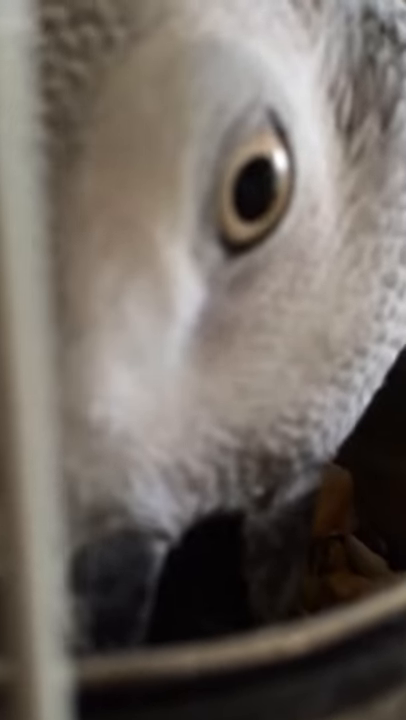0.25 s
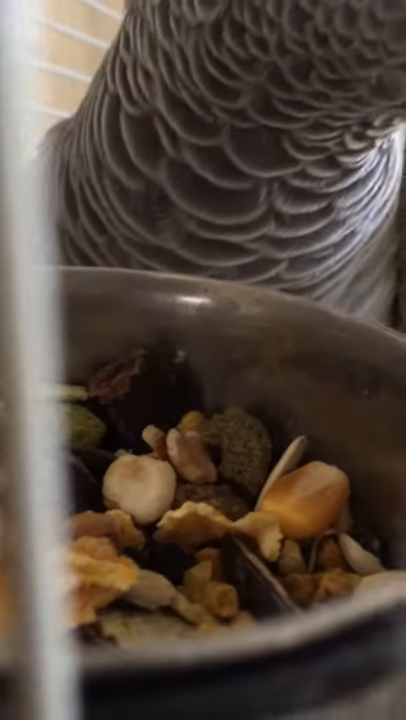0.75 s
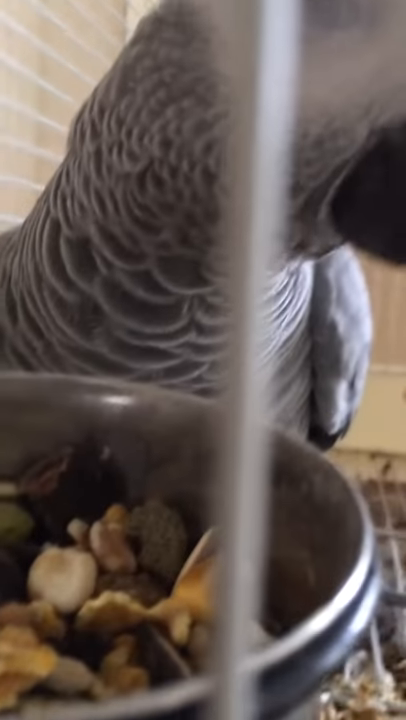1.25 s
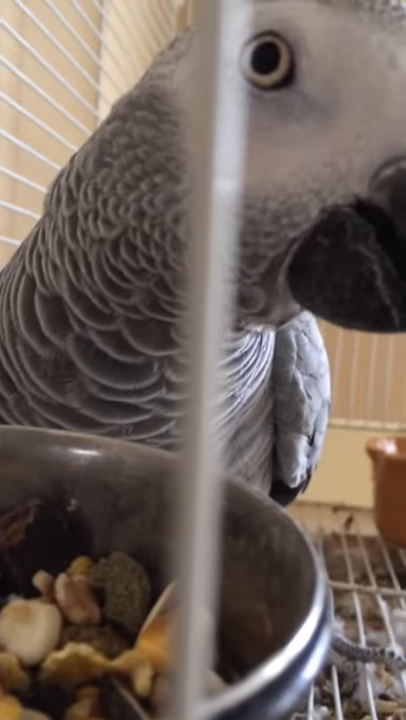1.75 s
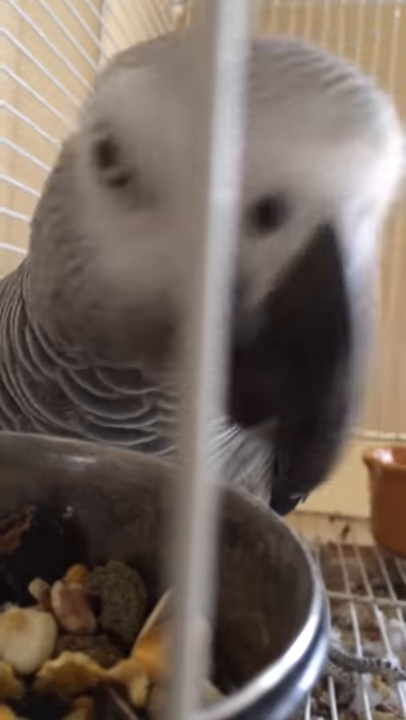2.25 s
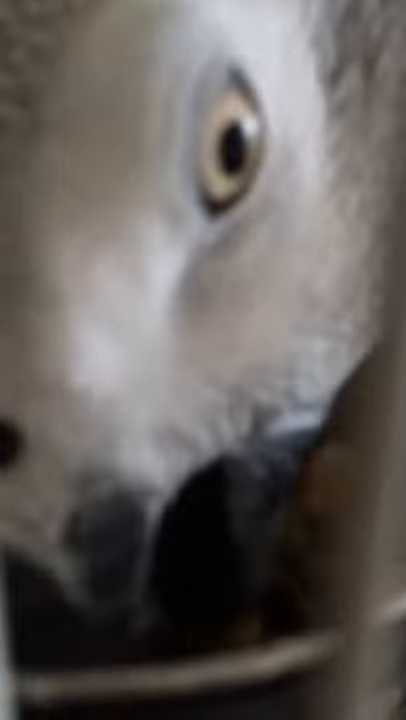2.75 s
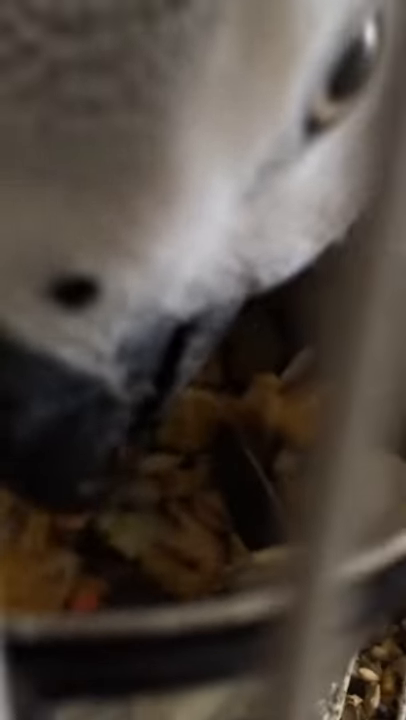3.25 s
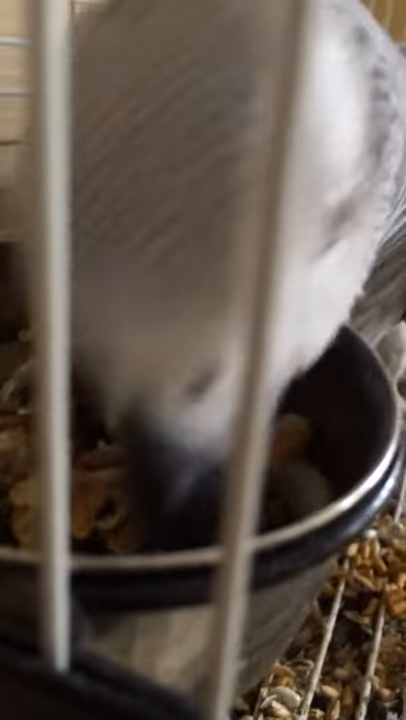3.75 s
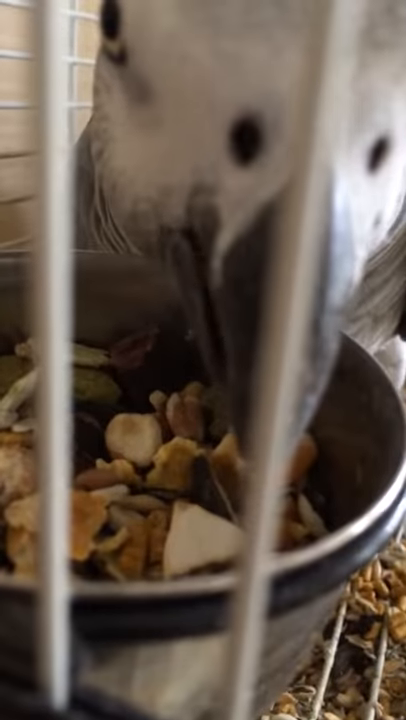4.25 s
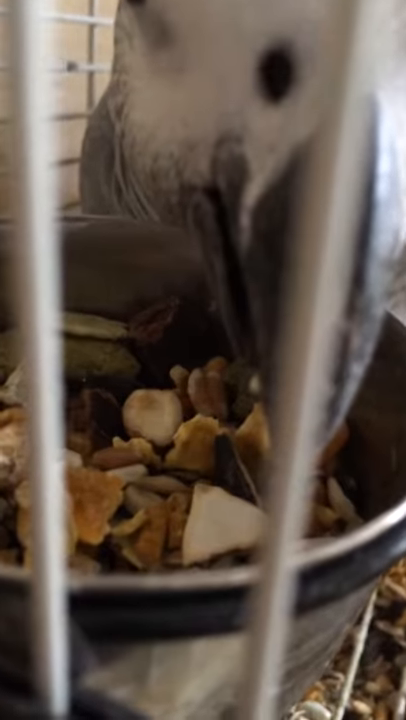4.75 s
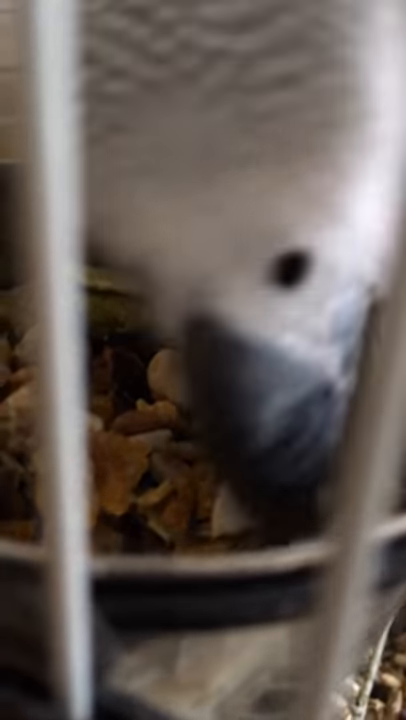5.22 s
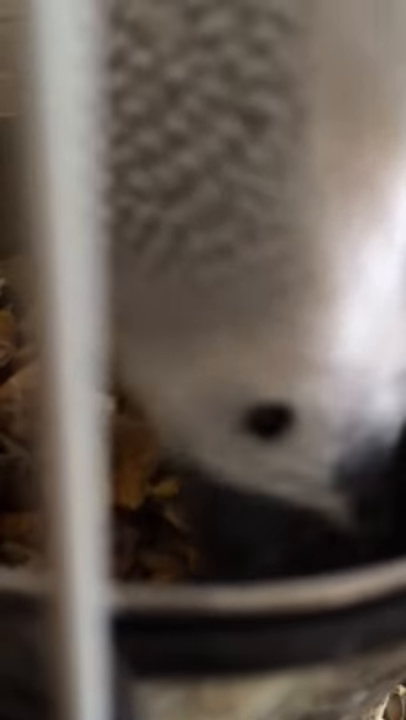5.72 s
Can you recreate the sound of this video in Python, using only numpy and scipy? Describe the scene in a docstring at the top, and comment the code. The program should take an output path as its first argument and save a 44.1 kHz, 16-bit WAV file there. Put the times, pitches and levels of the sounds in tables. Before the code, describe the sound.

A parrot eats from a metal food bowl in a small room, very close to the microphone. It opens with a click and a short gritty rattle of dry food, with a cluster of small crunches around 0.5 seconds. Loud, bright cracks of seed hulls come at about 1.1, 1.3 and 2 seconds, each briefly ringing beak and bowl, with a faint answer from the walls. From 2.8 to 3.2 seconds the beak rummages and crunches busily. Lighter clicks, taps and a soft chewing rustle continue until two sharp cracks, the loudest, land close together around 4.8 and 4.9 seconds. More stirring and snapping follows from 5.4 seconds to the end at 6. Throughout, household machines hum and rumble quietly, and a low drone swells from about 3 seconds. A few very faint, brief, thin tones sound far off between 1 and 5 seconds.

```python
"""Bright clicks and a gritty rattle, close up: a parrot cracks seed and rummages in a metal food bowl.
The microphone is a phone beside the bird in a small room. Each breaking hull rings beak and bowl, and
the walls answer faintly. Between snaps the beak stirs dry food, taps, and chews with a soft rustle.
Household machines hum and rumble underneath, swelling late; faint thin tones sound far off."""
import sys
import numpy as np
from scipy import signal
from scipy.fft import rfft, irfft, next_fast_len
from scipy.io import wavfile
from scipy.ndimage import uniform_filter1d, map_coordinates

SR = 44100
rng = np.random.default_rng(int(sys.argv[2]) if len(sys.argv) > 2 else 0)


def digitize_waveform(pressure):
    """Quantize a signal to 16-bit integers and store it at the path in sys.argv[1].

    Rows of a 2-D input are taken as channels; values are limited to [-1, 1].
    """
    field = np.atleast_2d(pressure).T
    bounded = np.clip(field, -1, 1)
    quanta = np.round(bounded * 32767).astype(np.int16)
    wavfile.write(sys.argv[1], SR, quanta)


N = 263718

# spectrum of the room tone: f/Hz, relative level/dB
ROOM_SPECTRUM = [(15, -34), (25, -8.5), (98, -5), (198, -6.5), (296, -10.5), (377, -16), (494, -18),
                 (550, -21), (629, -22.5), (941, -25.5), (1300, -26.5), (3610, -41.5), (3910, -40.5),
                 (6690, -47), (15400, -73)]
# hum bands of household machines: f/Hz, width/Hz, level/dB
MACHINE_HUM = [(59.7, 12, -60.5), (119, 24, -60), (182, 8.1, -61), (302, 52, -68.5), (1338, 150, -78.5)]
# a low machine that swells late: t/s, level/dB
DRONE_LEVELS = [(0, -69.5), (2.4, -71.5), (3.55, -60), (5.5, -55.5), (5.98, -54.5)]
# thin tones in the distance: t/s, length/s, f/Hz, level/dB
FAR_TONES = [(0.988, 0.06, 1314, -70), (1.626, 0.1, 1270, -69), (1.72, 0.056, 1460, -70),
             (1.763, 0.098, 1230, -74), (2.122, 0.15, 1286, -70.5), (3.337, 0.17, 552, -65.5),
             (3.859, 0.037, 1240, -65.5), (3.947, 0.13, 1415, -67), (5.02, 0.08, 1464, -74.5),
             (5.13, .12, 1513, -73)]
# soft gritty rustle of chewing and rummaging, with ringing after loud snaps: t/s, level/dB
RUSTLE_LEVELS = [(0, -81.5), (.5, -61.5), (.7, -74), (1.07, -73.5), (1.11, -66), (1.24, -74), (1.3, -67),
                 (1.45, -74), (1.99, -77), (2.03, -67), (2.25, -69), (2.5, -71.5), (2.76, -73),
                 (2.85, -55.5), (3.03, -45.5), (3.11, -69), (3.5, -76), (3.8, -66), (3.95, -73),
                 (4.28, -69), (4.56, -74), (4.78, -72), (4.95, -64.5), (5.21, -75), (5.5, -70), (5.66, -62),
                 (5.78, -70), (5.98, -64.5)]
# hollow of the open beak: f/Hz, width/Hz, gain/dB
BEAK_HOLLOW = [(6680, 1800, -8.5), (9400, 820, -10.5)]
# beak taps and the low ring of the loudest cracks: t/s, level/dB, f/Hz, overtones/dB re the fundamental
PITCHED_KNOCKS = [(.584, -43.5, 900, -12), (.705, -46, 940, -12), (1.086, -36, 2300, -9),
                  (1.2686, -24, 1530, -9), (1.46, -43.5, 894, -3.5), (2.0055, -25, 1530, -20),
                  (2.49, -51, 1720, -11), (3.108, -35.5, 890, -18), (3.496, -38, 1660, -15),
                  (3.833, -42.5, 910, -12), (3.928, -40, 1030, -9), (4.108, -48, 940, -10),
                  (4.454, -45, 880, -16), (4.501, -47, 790, -14), (4.8898, -28.5, 867, 3.5),
                  (5.156, -44, 795, -14), (5.968, -35, 990, -13)]
# overtones of a knock: multiple of the fundamental, added gain/dB
KNOCK_OVERTONES = [(1.6, 0.5), (2.35, 0.5)]
# beak strokes through food: t/s, length/s, level/dB, depth (0 rim, 1 bottom), dust/dB re level
FOOD_STROKES = [(0, 0.033, -45.5, 0.24, 1), (0.033, .067, -54.5, 0.91, -6), (0.105, 0.056, -62.5, 1, -9),
                (0.175, 0.089, -63, 1, -11.5), (0.296, 0.031, -64.5, 0.85, -4),
                (0.372, 0.086, -59, .9, -13), (0.43, 0.072, -55.5, .6, -16), (0.506, 0.048, -67, 1, -7),
                (0.59, 0.042, -67, 0.1, -7), (0.685, 0.021, -65, 0.22, -9.5), (0.832, 0.036, -75, 0.3, -16),
                (1.37, 0.036, -66.5, .1, -5), (1.48, .018, -66, .7, -9), (1.531, .013, -65, .3, -7),
                (1.71, 0.035, -63.5, 0.7, 1), (1.818, 0.076, -70.5, 0.1, -1), (2.197, .054, -76, 0.1, -7.5),
                (2.282, 0.011, -62, .1, -4.5), (2.4, 0.039, -65, 0.25, -5), (2.458, .034, -67, 0.5, -3.5),
                (2.787, 0.044, -54.5, 0.8, 0), (2.847, 0.025, -51, 0.7, -1),
                (2.906, 0.031, -43.5, 0.78, -2.5), (2.943, .14, -47.5, 0.91, -9),
                (3.084, 0.044, -56, 1, -12), (3.166, 0.031, -59.5, 1, -7), (3.309, 0.0082, -54, 0.95, -8.5),
                (3.369, .021, -63, 0.9, -11), (3.605, 0.043, -50.5, 0.46, -1.5),
                (3.657, 0.023, -48.5, 0.66, 4), (3.67, 0.047, -58.5, 1, 0), (3.723, 0.047, -53, 0.8, -3),
                (3.781, 0.046, -59.5, 0.74, -6), (3.846, 0.0053, -51.5, 0.14, -5),
                (3.886, 0.018, -64.5, 0.14, -6), (4.006, 0.038, -59.5, 0.13, -4),
                (4.1, 0.0082, -58, 0.5, -12), (4.135, 0.022, -60.5, 0.23, 1), (4.17, 0.027, -75, 0.13, -17),
                (4.223, .03, -73, 0.1, -14), (4.262, 0.023, -65.5, 0, -14),
                (4.301, 0.056, -65.5, 0.16, -17), (4.372, .011, -65, .2, -14),
                (4.43, 0.016, -62, 0.03, -15.5), (4.488, 0.013, -64, 0.15, -6),
                (4.525, 0.039, -71, 0.02, 2), (4.614, 0.025, -74.5, 0.17, -13),
                (5.043, .015, -64, 0.07, -9.5), (5.188, 0.02, -58.5, 0.28, -1),
                (5.406, 0.032, -59.5, 0.9, 0), (5.449, 0.022, -68, 0.8, 3), (5.528, 0.032, -63, 1, -9),
                (5.603, 0.018, -58, 1, -1), (5.64, .037, -65, 0.6, 11.5), (5.705, 0.044, -58, 0.92, 0),
                (5.752, 0.043, -55.5, 0.98, -6), (5.796, 0.04, -49, 0.76, -9),
                (5.873, 0.045, -59, 0.73, -12), (5.95, .034, -58.5, 1, -7.5)]
# spectrum of loose food: f/Hz, relative level/dB
CRUMB_SPECTRUM = [(1500, -12), (2400, -9), (3100, -0.5), (3900, -0.5), (5500, 1.5), (8500, 1.5),
                  (10500, -11.5), (15000, -30)]
# spectrum of its finest dust: f/Hz, relative level/dB
DUST_SPECTRUM = [(7000, -43), (9500, 9), (12000, 8), (15500, 7)]
# breaking hulls: t/s, energy/dB, f/Hz, then bite/dB, knock/dB, sparkle/dB re energy
HULL_SNAPS = [(.0037, -12.5, 6870, -39, -34, -9), (0.031, -21, 9200, -17, -25, -15),
              (0.0532, -26, 7900, -7, -20, -8), (.0726, -36, 6800, 10, -3, -4),
              (0.138, -33.5, 8500, 5, -2, -5), (.2168, -37, 7800, 3.5, -8, -18),
              (.3135, -32, 9500, -6, -20, 5.5), (.3497, -39.5, 8600, -2, -9, -7),
              (.3983, -38, 9450, -4, -6, 3), (.422, -28.5, 7300, 1, -7, -21),
              (0.437, -22, 7000, -10, -26, -15), (.445, -18.5, 5000, -4, -21, -22),
              (0.4523, -21.5, 5160, -1, -22, -5), (0.4624, -18.5, 6900, -7, -27, -16),
              (0.4792, -23.5, 8600, -9, -11, -16), (0.4877, -20, 6260, -16, -30, -19),
              (0.4955, -20.5, 8700, -4.5, -14, -21), (.548, -34.5, 5100, -14, -2, -8),
              (.5986, -27, 6040, -0.5, -13, -17.5), (.9838, -42, 6740, -6.5, -17, -6),
              (1.0793, -30, 6700, -26, -9.5, -14), (1.0866, 0, 7300, -4, -13, -30),
              (1.2569, -42.5, 7000, -15, -13, -14), (1.2685, -1, 6670, -12.5, -10.5, -6.5),
              (1.336, -41.5, 6900, -13, -9, -8), (1.4604, -40, 7600, -3, -2, -3),
              (1.4743, -29, 6700, -19, -8.5, -5), (1.4882, -32.5, 6960, -19, -2, -13),
              (1.5373, -32.5, 9500, -12, -16, 8.5), (1.5918, -17.5, 7040, -26, -16.5, -1.5),
              (1.654, -13, 8100, -23, -19.5, -4), (1.722, -31, 7040, -20, -23, -5.5),
              (1.7458, -39, 7000, -13, -8, 0), (2.0044, -5.5, 6270, -14.5, -7, -6),
              (2.1103, -24, 7600, -16, -33, -4), (2.1137, -25, 7550, -24, -27, -3),
              (2.161, -25, 6750, -26.5, -18, -8), (2.2895, -26, 7000, -27, -21, -20),
              (2.4142, -33.5, 6400, -7, -9, -13), (2.4664, -39.5, 8900, -26, -13, -2),
              (2.5278, -41.5, 9500, -6, -14, 8), (2.748, -42.5, 5500, -22, -13.5, -8.5),
              (2.7732, -40.5, 5100, -3, -8, -6), (2.8015, -23.5, 8900, -8, -22, -4),
              (2.8602, -21.5, 8350, -10, -23, -2), (2.8944, -21.5, 9200, -21, -24, -6),
              (2.9276, -19, 5470, 0, -9, -2), (2.9485, -19.5, 6850, 3.5, -13, -6),
              (2.9618, -10.5, 7640, -29, -27, -9), (2.9648, -18.5, 6940, 2, -18, -8),
              (2.9824, -14.5, 6370, -12, -27, -16), (2.9944, -27, 9100, -12, -18, 7),
              (3.009, -28, 9500, -10, -2, 1), (3.0255, -18, 7280, -10, -16, -10),
              (3.0444, -18.5, 5500, -12, -9, -3), (3.099, -24.5, 5000, -8, -1, -13),
              (3.1495, -13, 5500, -8, -16, -37), (3.1776, -25.5, 7240, 0, -21, -15),
              (3.1816, -19.5, 6300, -11, -27, -16), (3.188, -25, 5300, -10, -21, -10),
              (3.2212, -32.5, 6200, -15, -9, -20.5), (3.311, -23, 6500, -7.5, -12.5, -0.5),
              (3.3372, -29, 5070, -2.5, -14.5, -19.5), (3.3424, -30, 4900, -13, -10, -22),
              (3.3712, -23, 5250, -13, -25, -18.5), (3.3888, -36, 4900, 7, -8.5, -16),
              (3.4471, -14, 7400, -43, -40, -6.5), (3.608, -25.5, 8200, -0.5, -27, -2),
              (3.6673, -13, 7550, -17, -34, -4), (3.6775, -15.5, 7200, -4.5, -17, -3),
              (3.729, -26, 7500, -20.5, -18, -14), (3.734, -25.5, 7800, -3, -19, -13),
              (3.7617, -23, 9600, -26, -27, -12.5), (3.8052, -25, 9400, -26, -19, -7),
              (3.8559, -32, 6300, -1.5, -1, -14), (3.8899, -41, 7100, -7, -8, -3),
              (3.9255, -28, 6200, -8.5, -15, -23), (3.9521, -27, 5960, -14, -16.5, -29),
              (3.9987, -18.5, 7000, -26, -34, 0), (4.0179, -29, 6650, -32.5, -21, -10),
              (4.0249, -31, 6700, -25, -18, -18), (4.0463, -23.5, 6550, -25, -27, -9.5),
              (4.0574, -35, 7100, -16, -16, -11), (4.1049, -42.5, 6900, -5, -8, 9.5),
              (4.1334, -30, 6100, -26, -21, -8.5), (4.1406, -27.5, 8250, -20, -22, -1),
              (4.2204, -31.5, 9500, -29, -26, -13), (4.2471, -32, 6600, -27, -24, -21),
              (4.2907, -25, 9500, -26, -22, -14.5), (4.2944, -27, 7100, -30, -21, -17),
              (4.278, -40.5, 6840, -22, -20, -14), (4.3137, -34, 6070, -19, -7, -16),
              (4.347, -39, 6300, -24, -17, -20), (4.3825, -28, 6370, -10.5, -16, -11),
              (4.4264, -32.5, 6300, -14, -16.5, -17), (4.4364, -33.5, 6500, -3, -14.5, -22),
              (4.506, -27, 9000, -22, -24, 0.5), (4.765, -30, 6400, -36, -26, -16.5),
              (4.774, -36, 6760, -17, -17, -20), (4.7993, -40.5, 6800, -9, -17, -11),
              (4.827, 3, 6400, -24, -21.5, -28), (4.8575, -28, 6900, -6, -26, -12),
              (4.8899, 5, 6340, -13.5, -13, -21), (4.9968, -29, 7300, -30, -25, -13),
              (5.0861, -23, 6060, -15.5, -10, -9), (5.1567, -20.5, 6500, -27, -33, -31),
              (5.203, -31, 7040, -18, -11, -11), (5.249, -23, 5400, -5.5, -11, -8),
              (5.2932, -31.5, 7900, -20.5, -18, -18), (5.301, -32, 7800, -6, -12, -1),
              (5.3094, -37, 9500, -9, -9, -3), (5.415, -27, 5840, -8, -10, -7),
              (5.4307, -28, 6830, -16, -9.5, -6.5), (5.5519, -36.5, 7000, 5, 7, -1),
              (5.5905, -27, 6900, -9, -9.5, 0), (5.5965, -11, 8500, -13, 2.5, -5),
              (5.622, -27, 6700, -12, 2.5, -7), (5.6591, -31, 8300, -21, -15, 2),
              (5.7217, -26.5, 7760, -12, -3, -6), (5.7957, -20.5, 6800, 0.5, -9, -7),
              (5.8036, -17.5, 6700, -9, -12, -30), (5.8202, -13, 7150, -6.5, -24.5, -18),
              (5.9035, -26.5, 7300, -26, -27, -19)]
# ring of hull and beak horn: f/Hz, width/Hz, gain/dB
BEAK_MODES = [(5500, 170, -33), (6340, 155, 0.5), (7400, 1500, -46)]
# the hull's lower ring, a snap's bite: f/Hz, width/Hz, gain/dB
BITE_MODES = [(3700, 2600, 0)]
# ring of the bowl, a snap's knock: f/Hz, width/Hz, gain/dB
BOWL_MODES = [(487, 210, -10), (887, 170, -8), (1990, 780, -16)]
# top treble of a snap, its sparkle: f/Hz, width/Hz, gain/dB
SPARKLE_MODES = [(10670, 1330, 5.5), (12640, 3860, 4)]
# colour of the room's answer: f/Hz, width/Hz, gain/dB
ROOM_COLOUR = [(3350, 1900, -10), (6380, 1400, 7.5), (12500, 8300, -6)]

BODY_DB, RASP_DB, CRUMBS_DB = (-29, -3), (4.5, -34), (-2.5, -1)  # re stroke level: (rim, bottom)
NIBBLE_COUNT, NIBBLE_DB, NIBBLE_SPREAD_DB = 70, -45, 4.5  # faint ticks of the working beak
GIVE_S, GIVE_DB = .0058, -38  # the hull gives just before it breaks: lead, level re the snap
WALL_S, WALL_DB = .0108, -31  # slap off the nearest wall: delay, level re the snap


def amp(db):
    """Gain of a level in dB."""
    return 10 ** (np.asarray(db) / 20)


def unit(x):
    """Each row scaled to rms 1."""
    return x / np.sqrt(np.mean(x ** 2, axis=-1, keepdims=True) + 1e-30)


def columns(rows):
    """A table's columns, shaped to give one event per row."""
    return np.transpose(rows)[:, :, None]


def spectrum(points):
    """Response through (Hz, dB) points on a log frequency axis."""
    hz, db = np.transpose(points)
    return lambda f: amp(np.interp(np.log(f + 1), np.log(hz + 1), db))


def curve(points):
    """One value per sample through (s, value) points."""
    return np.interp(np.arange(N) / SR, *np.transpose(points))


def wobble(rate):
    """A smooth random curve, rate knots a second."""
    return map_coordinates(rng.standard_normal(int(N * rate / SR) + 4), [np.arange(N) * rate / SR])


def filtered(x, response):
    """x through a complex response of frequency."""
    n = x.shape[-1]
    size = next_fast_len(min(n, 4096) + n)
    return irfft(rfft(x, size) * response(np.fft.rfftfreq(size, 1 / SR)), size)[..., :n]


def coloured(x, response, energy_db):
    """Each row filtered, then scaled to the given energy."""
    y = filtered(x, response)
    return amp(energy_db) * y / np.linalg.norm(y, axis=1, keepdims=True)


def modes(table, passes=1):
    """Causal response of (Hz, width, dB) resonances of alternating sign, applied passes times."""
    return lambda f: sum((-1) ** k * amp(db) * 1j * f * width / (hz * hz - f * f + 1j * f * width)
                         for k, (hz, width, db) in enumerate(table)) ** passes


def place(times, shapes):
    """Lay one short shape per row on the time line."""
    at = np.round(np.maximum(times, 0) * SR).astype(int)[:, None] + np.arange(shapes.shape[1])
    return np.bincount(at.ravel(), shapes.ravel(), N + SR)[:N]


def noise_band(hz, width):
    """Narrow noise around one pitch, rms 1."""
    return unit(filtered(rng.standard_normal(N), lambda f: 1 / (1 + (2 * (f - hz) / width) ** 2)))


def household():
    """Room tone all round the microphone, with wavering machine hum and a swelling low drone."""
    air = amp(-54.5 + 1.26 * wobble(23)) * unit(filtered(rng.standard_normal(N), spectrum(ROOM_SPECTRUM)))
    hum = sum(amp(db + 1.5 * wobble(1.4)) * noise_band(hz, width) for hz, width, db in MACHINE_HUM)
    return air + hum + amp(curve(DRONE_LEVELS)) * noise_band(hz=97.9, width=4.2)


def far_tones():
    """Far off, thin steady pitches start gently, flicker in level and fade."""
    start, length, hz, db = columns(FAR_TONES)
    t = np.arange(12000) / SR
    envelope = (1 - np.exp(-t / .0061)) * amp(-60 * np.maximum(t - length, 0) / .26)
    return place(start[:, 0], amp(db) * envelope * np.sin(2 * np.pi * hz * t)) * amp(4.8 * wobble(25))


def grit(rate, size_db, hiss):
    """Tiny crumb contacts, rate a second, in clumps over their own scraping hiss."""
    hits = rng.random(N) < rate / SR
    size = np.minimum(rng.exponential(size=N), 3)
    crumbs = hits * amp(size_db * size + 5.8 * wobble(90)) * rng.standard_normal(N)
    scrape = hiss * amp(2.5 * wobble(70)) * rng.standard_normal(N)
    frames = signal.stft(unit(crumbs) + scrape, nperseg=128)[2]
    # random patches in frequency and time give each moment its own colour
    patches = uniform_filter1d(rng.standard_normal(frames.shape), size=6, axis=0)
    patches = uniform_filter1d(patches, size=4, axis=1)
    return signal.istft(frames * amp(1.54 * patches / patches.std()), nperseg=128)[1][:N]


def soft_rustle():
    """Gritty rustle of chewing and rummaging, and ringing after loud snaps, coloured by the open beak."""
    beak = lambda f: modes(BEAK_HOLLOW, passes=2)(f) + amp(-11) * f / (f + 3000)
    rustle = grit(rate=1500, size_db=2.5, hiss=2.5)
    return amp(curve(RUSTLE_LEVELS)) * unit(filtered(rustle, beak))


def pitched_knocks():
    """Beak taps and the low ring of the loudest cracks: a damped, rough pitch with uneven overtones."""
    start, db, hz, overtone_db = columns(PITCHED_KNOCKS)
    t = np.arange(1500) / SR
    phase = 2 * np.pi * hz * t
    ring = np.sin(phase) + sum(amp(overtone_db + gain) * np.sin(k * phase) for k, gain in KNOCK_OVERTONES)
    rough = 1 + .3 * unit(uniform_filter1d(rng.standard_normal(ring.shape), size=40, axis=1))
    envelope = amp(db - 60 * t / .016) * (1 - np.exp(-t / .00082))
    return place(start[:, 0], envelope * ring * rough)


def rummaging():
    """Close by, the beak rattles loose food; shallow strokes sound the beak, deep ones the bowl."""
    start, length, db, depth, dust_db = columns(FOOD_STROKES)
    t = np.arange(9000) / SR
    envelope = (1 - np.exp(-t / .003)) * amp(-60 * np.maximum(t - length, 0) / .028)
    rattle = grit(rate=1200, size_db=-1, hiss=1.64)

    def layer(response, relative_db):
        return place(start[:, 0], amp(db + relative_db) * envelope) * unit(filtered(rattle, response))

    at_depth = lambda rim, bottom: rim + (bottom - rim) * depth
    crumbs = layer(spectrum(CRUMB_SPECTRUM), at_depth(*CRUMBS_DB))
    rasp = layer(modes(BEAK_HOLLOW, passes=2), at_depth(*RASP_DB))
    dust = layer(spectrum(DUST_SPECTRUM), dust_db)
    bowl = layer(modes([(1450, 500, 0), (2300, 1200, -3), (3200, 500, -3)], passes=2), at_depth(*BODY_DB))
    return crumbs + rasp + dust + bowl


def snap_events():
    """The listed snaps, a give before the loudest, and nibbles that crowd where the rustle is strong."""
    snaps = np.array(HULL_SNAPS)
    gives = snaps + [-GIVE_S, GIVE_DB, 0, 0, 0, 0]
    when, pitch = rng.random((NIBBLE_COUNT, 2)).T
    scatter = rng.standard_normal((NIBBLE_COUNT, 4))
    activity = np.cumsum(amp(np.minimum(curve(RUSTLE_LEVELS), -62)))
    times = np.interp(when, activity / activity[-1], np.arange(N) / SR)
    energy_db = NIBBLE_DB + NIBBLE_SPREAD_DB * scatter[:, 0]
    parts_db = np.array([-17, -8.5, -21.5]) + 5 * scatter[:, 1:]  # bite, knock, sparkle
    nibbles = np.column_stack([times, energy_db, 5500 + 4000 * pitch, parts_db])
    return np.vstack([snaps, gives[gives[:, 1] > -50], nibbles])


def room_tails(db, knock_db, decay_s=.42, gap_s=.008):
    """The walls answer each snap after a gap: a bright tail for the hull, a darker one for the bowl."""
    t = np.arange(9000) / SR
    tail = rng.standard_normal((len(db), len(t))) * amp(-60 * t / decay_s) * (t > gap_s)
    bright = coloured(tail, modes(ROOM_COLOUR, passes=2), db - 25)
    dark = coloured(tail, modes([(1400, 1500, 0)], passes=2), db + knock_db - 17.5)
    return bright + dark


def hull_snaps(creak_s=.001):
    """Right at the microphone a hull creaks, breaks and splinters, ringing horn, hull and bowl."""
    times, db, hz, bite_db, knock_db, sparkle_db = columns(snap_events())
    t = np.arange(900) / SR
    creak = amp(-20) * (t / creak_s) * (t < creak_s)
    crack = np.exp(-((t - creak_s) * SR / 1.08) ** 2)
    after = np.maximum(t - creak_s, 0)
    splinters = (amp(-11 - 60 * after / .0025) + amp(-29 - 60 * after / .015)) * (t > creak_s)
    burst = rng.standard_normal((len(times), len(t))) * (creak + splinters) + crack

    def beak(f):
        ring = modes(BEAK_MODES)(f) + modes([(hz, .3 * hz, 3)])(f)  # each snap adds its own pitch
        return ring * 1j * f / (4000 + 1j * f)  # high-pass

    def bowl(f):
        ring = modes(BOWL_MODES)(f) + modes([(1545, 250, 0)])(f)
        return ring / (1 + 1j * f / 3000) ** 2 * 1j * f / (600 + 1j * f)  # band-pass

    click = coloured(burst, beak, db)
    click += coloured(burst, modes(BITE_MODES, passes=2), db + bite_db)
    click += coloured(burst, modes(SPARKLE_MODES, passes=2), db + sparkle_db)
    click += coloured(burst, bowl, db + knock_db)
    start = np.maximum(times[:, 0] - creak_s - .0002, 0)
    wall_slap = amp(WALL_DB) * place(start + WALL_S, click)
    return place(start, click) + wall_slap + place(times[:, 0], room_tails(db, knock_db))


def scene():
    """One microphone position: the parrot up close, the house behind it."""
    parrot = hull_snaps() + pitched_knocks() + rummaging() + soft_rustle()
    return (parrot + far_tones() + household())[None]


def record(dry, bass_hz=30, shelf_hz=15250, top_hz=16494):
    """The phone drops the deepest bass, falls steeply near 15 kHz and keeps nothing above top_hz."""
    low_cut = lambda f: f ** 4 / (f ** 4 + bass_hz ** 4)
    shelf = lambda f: amp(-38 / (1 + np.exp(-np.clip((f - shelf_hz) / 70, -50, 50))))
    return filtered(dry, lambda f: low_cut(f) * shelf(f) * (f < top_hz))


dry = scene()
out = record(dry)
digitize_waveform(out)
```